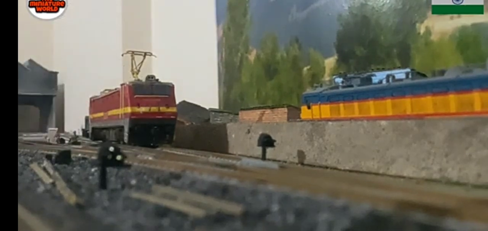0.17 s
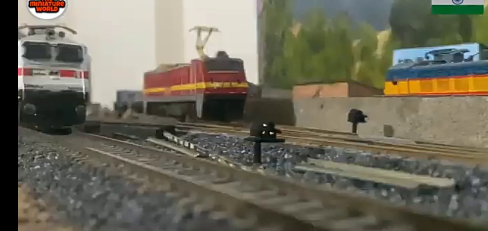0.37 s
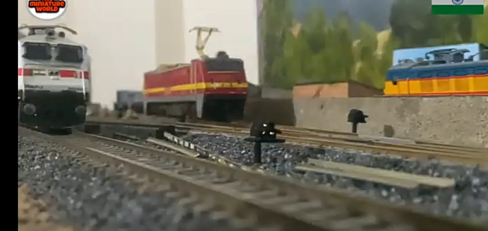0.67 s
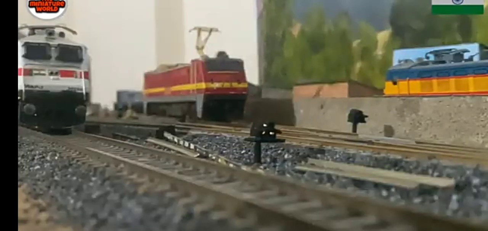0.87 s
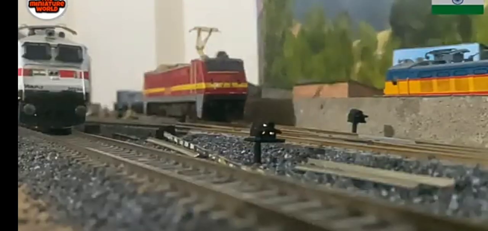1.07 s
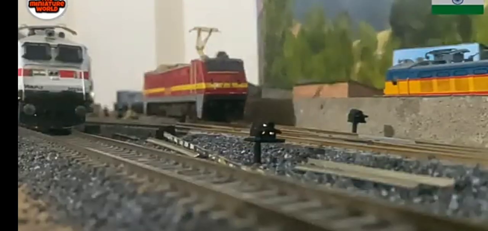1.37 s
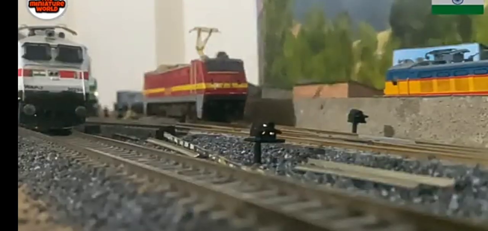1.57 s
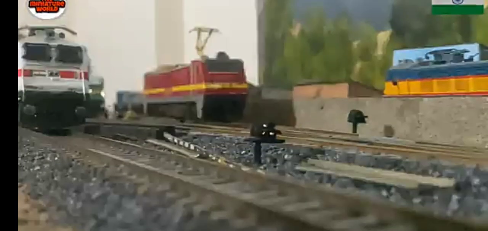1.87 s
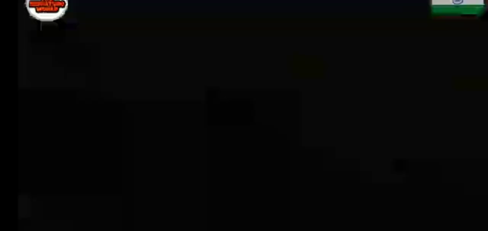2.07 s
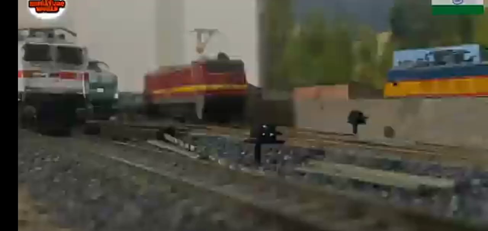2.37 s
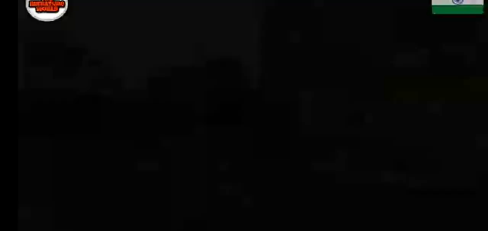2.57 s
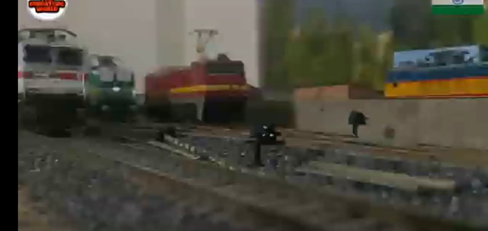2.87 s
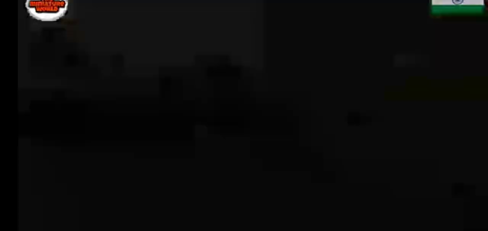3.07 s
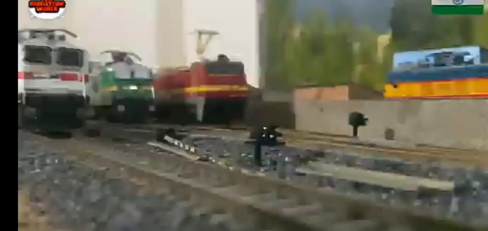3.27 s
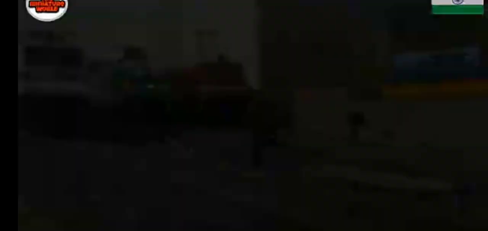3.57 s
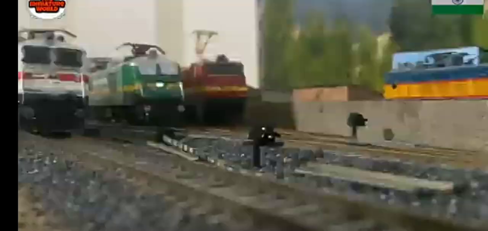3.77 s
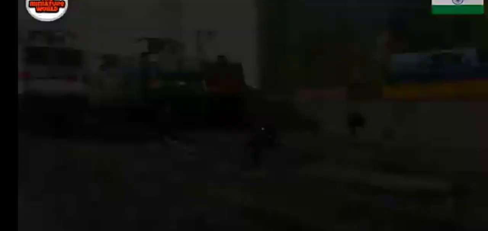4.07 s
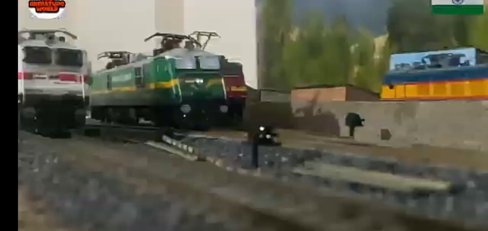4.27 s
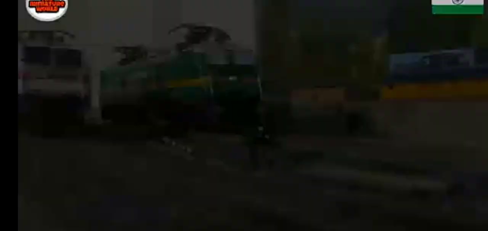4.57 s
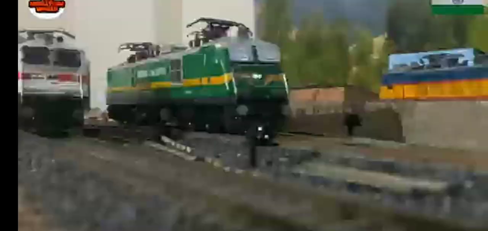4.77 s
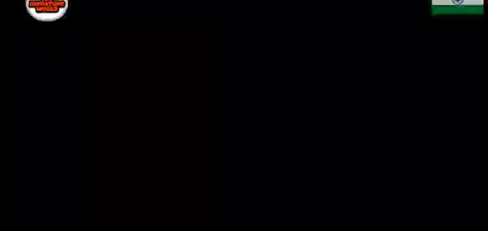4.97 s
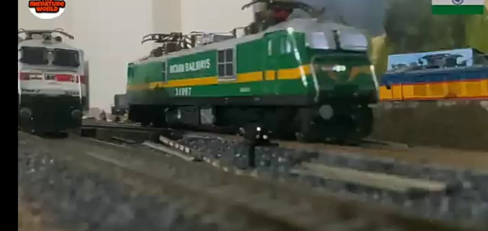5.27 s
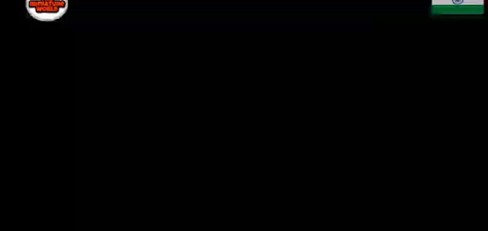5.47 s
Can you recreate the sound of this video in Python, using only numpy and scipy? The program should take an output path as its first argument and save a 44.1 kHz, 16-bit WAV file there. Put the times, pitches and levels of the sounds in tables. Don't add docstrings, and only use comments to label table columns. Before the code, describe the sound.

A toy-scale locomotive drones in a boxy midrange whir with a faint steady whine. It drops away, exposing far-off wheels grinding on rails and soft low pulses through a hollow baseboard. Then the motor snaps back much louder, with a fluttering gear buzz, and strengthens again while scraping wheel hiss draws nearer. Rail joints click, one sharply near the end. Indoors, close small microphone, grainy flickering highs and tiny ticks.

```python
import sys
import numpy as np
from scipy import signal
from scipy.fft import rfft, irfft, next_fast_len
from scipy.io import wavfile
from scipy.ndimage import uniform_filter1d, map_coordinates

SR = 44100
rng = np.random.default_rng(int(sys.argv[2]) if len(sys.argv) > 2 else 0)


def linear_from_db(decibels):
    return 10 ** (np.asarray(decibels, float) / 20)


def unload_wav(signal):
    wavfile.write(
        sys.argv[1],
        SR,
        np.round(np.clip(np.atleast_2d(signal).T, -1, 1) * 32767).astype(np.int16),
    )


N = 248274
T = np.arange(N) / SR
FRAME_S = 0.02
FULL_POWER_S = 3.578


def unit(x):
    return x / np.sqrt(np.mean(x ** 2) + 1e-20)


def curves(*tables):
    s, *cols = np.transpose(np.concatenate(tables))
    return [np.interp(T, s, c) for c in cols]


def wobble(rate):
    knots = rng.standard_normal(int(N * rate / SR) + 4)
    return map_coordinates(knots, [T * rate])


def coloured(x, points):
    m = next_fast_len(N + 8192)
    f, db = np.transpose(points)
    log_hz = np.log(np.fft.rfftfreq(m, 1 / SR) + 1)
    gain = linear_from_db(np.interp(log_hz, np.log(f + 1), db, left=-120, right=-120))
    return unit(irfft(rfft(x, m) * gain, m)[:N])


def patchy(depth_db, size=512):
    z = signal.stft(rng.standard_normal(N), nperseg=size)[2]
    field = uniform_filter1d(rng.standard_normal(z.shape), size=4, axis=0)
    field = uniform_filter1d(field, size=5, axis=1)
    return signal.istft(z * linear_from_db(depth_db * unit(field)), nperseg=size)[1][:N]


def inside(spans):
    mask = sum((T >= a) & (T < b) for a, b in spans)
    return uniform_filter1d(mask.astype(float), size=110, origin=54)


def near_locomotive():
    # start_s, whir_db
    drive = [
        [(0, -35.5), (.2, -36.5), (1.128, -34.5)],
        [(2.549, -28), (2.75, -29), (2.9, -27.5), (3.05, -30), (3.35, -30.5), (3.575, -28.5)],
        [(3.585, -26), (4.2, -25.5), (4.7, -24.5), (5.63, -25)],
    ]
    # pitch_hz, level_db (per Hz)
    shell = [(150, -47.5), (230, -22.5), (400, -20), (750, -16.5), (1020, -14), (1160, -5), (1250, 2.5),
             (1330, -0.5), (1600, -5.5), (2050, -2), (2980, -14), (3300, -29), (3650, -27), (4350, -39.5)]
    # order (multiple of shaft rate), level_db
    mesh_orders = [(13, -20), (14, -9.5), (15, -1), (16, -4.5), (17, -8), (18, -8), (19, -11), (24, -3.5)]
    off_s, on_s = 1.128, 2.549
    shaft_hz, whine_hz = 16.605, 884.7
    whine_db, whine_rise_s, whine_idle_db = -13.5, 0.13, -64.5
    mesh_db, mesh_bite_s, mesh_rise_s = -23, 2.9, 0.28

    whir_db, = curves(*drive)
    power = 1 - inside([(off_s, on_s)])
    turn = 2 * np.pi * shaft_hz * T + 0.04 * wobble(1.5)
    chatter = patchy(depth_db=-0.12) * linear_from_db(0.52 * np.cos(turn) + 0.75 * wobble(90))
    whir = linear_from_db(whir_db + 3.0) * coloured(chatter, shell)

    since_s = np.where(T < on_s, T, T - on_s)
    lock = np.clip(since_s / whine_rise_s, 0, 1) ** 2
    whine_gain = power * linear_from_db(whir_db + whine_db) * lock + linear_from_db(whine_idle_db)
    whine_tone = np.sin(2 * np.pi * whine_hz * T + 0.6 * wobble(12))
    whine = whine_gain * linear_from_db(1.5 + 2.2 * wobble(30)) * whine_tone

    mesh = np.zeros(N)
    for order, db in mesh_orders:
        phase = 1.52 - 1.2 * (order - 15) - 0.25 * (order - 15) ** 2
        mesh += linear_from_db(db + 1.7 * wobble(2.91)) * np.sin(order * turn + phase)
    load = np.clip((T - mesh_bite_s) / mesh_rise_s, 0, 1)
    return power * (whir + load * linear_from_db(whir_db + mesh_db) * mesh) + whine


def far_train():
    # start_s, rolling_db
    roll = [(0, -45), (.6, -43.5), (1.1, -36), (1.5, -33), (2.2, -33.5), (2.5, -34), (3, -30.5), (4, -30.5),
            (5.63, -29)]
    # pitch_hz, level_db (per Hz)
    rails = [(450, -42.5), (680, -22.5), (850, -9.5), (1100, -5.5), (1210, -2), (1255, 2.5), (1310, -7),
             (1700, -11), (2030, -5), (2300, -7), (2480, -13), (3300, -27.5), (3750, -30), (4250, -40)]
    # pitch_hz, level_db (per Hz)
    hollow = [(150, -23.5), (200, -7.5), (270, -8.5), (300, -2.5), (340, -7), (410, -5), (460, -2.5),
              (525, -1), (620, -4.5), (700, -11.5), (850, -27.5)]
    roll_db, = curves(roll)
    rolling = coloured(patchy(depth_db=1.1) * linear_from_db(0.7 * wobble(120)), rails)
    rumble = coloured(patchy(depth_db=4.5, size=2048), hollow)
    rumble_db = -47.5 + 0.65 * (roll_db + 34)
    return linear_from_db(roll_db) * rolling + linear_from_db(rumble_db) * rumble


def baseboard():
    # pitch_hz, level_db (per Hz)
    plank = [(15, -50), (25, -28.5), (46, -25), (64, -9), (75, -13), (104, -2), (120, -8.5), (140, -8.5),
             (165, -7.5), (190, -17.5), (260, -44)]
    # peak_s, peak_db, pitch_hz
    throb = [(0.326, -39, 108), (0.399, -39, 111), (0.714, -41.5, 107), (0.813, -36, 118),
             (0.896, -37, 110), (1.03, -46, 105), (1.226, -39, 109), (1.316, -37, 110), (1.397, -40, 103),
             (1.534, -41, 100), (1.612, -41, 107), (1.741, -43, 103), (1.814, -35.5, 108),
             (1.906, -41, 119), (1.957, -39, 103), (2.088, -33.5, 110), (2.202, -40, 112),
             (2.282, -35, 101), (2.372, -44, 105), (2.566, -40, 117), (2.698, -38.5, 99), (2.772, -44, 119),
             (2.887, -44, 115), (2.966, -40, 100), (3.042, -39, 119), (3.244, -46, 102), (3.362, -41, 102),
             (3.623, -43, 105), (3.992, -42, 110), (4.079, -40, 103)]
    step_s, gap_s, step_db, fade_db, step_hz = 4.34, 0.0908, -40, 0.4, 106

    out = linear_from_db(-52) * coloured(patchy(depth_db=1.0), plank)
    steady = [(step_s + gap_s * k, step_db - fade_db * k + 1.5 * a, step_hz + 5.0 * b)
              for k, (a, b) in enumerate(rng.standard_normal((14, 2)))]
    half = 2600
    t = np.arange(-half, half) / SR
    swell = np.exp(-(t / 0.018) ** 2)
    for s, db, hz in [*throb, *steady]:
        at = round(s * SR)
        phase = rng.uniform(0, 2 * np.pi)
        out[at - half:at + half] += linear_from_db(db - 1.5) * swell * np.sin(2 * np.pi * hz * t + phase)
    return out


def lost_frames():
    # start_s, end_s
    gaps = [(.65, .71), (.73, .85), (1.17, 1.25), (1.63, 1.69), (1.89, 1.93), (3.27, 3.31), (3.55, 3.59),
            (3.87, 3.91), (4.27, 4.31), (4.69, 4.73)]
    # start_s, frames_lost (count)
    flutters = [(.91, 2), (1.05, 3), (1.45, 4), (1.77, 3), (2.45, 2)]
    strays = [.55, .61, 1.29, 1.35, 1.99, 2.23, 2.39, 3.17, 3.23, 3.37, 3.51, 3.77, 4.49, 4.61, 4.85, 5.17,
              5.23]
    singles = [s + 2 * FRAME_S * k for s, count in flutters for k in range(count)]
    return [*gaps, *[(s, s + FRAME_S) for s in [*singles, *strays]]]


def wheel_hiss():
    # start_s, hiss_db
    approach = [(0, -72.5), (.55, -75.5), (.56, -61.5), (1.2, -62), (1.35, -57.5), (2.1, -55.5), (2.8, -57),
                (3.6, -51.5), (4.45, -52.5), (4.7, -50.5), (5.4, -48), (5.63, -44.5)]
    # pitch_hz, level_db (per Hz)
    wheels = [(3600, -38.5), (4300, -9), (4600, -4), (4900, -0.5), (5900, -1), (6300, -6.5), (6550, -22),
              (6700, -29.5), (7000, -63)]
    # pitch_hz, level_db (per Hz)
    upper_band = [(6550, -40.5), (6750, -7), (7100, 1), (7400, -0.5), (7900, -7.5), (8050, -14.5),
                  (8150, -44.5)]
    # pitch_hz, level_db (per Hz)
    top_band = [(7900, -61.5), (8050, -10), (8700, -10.5), (9500, -23), (9650, -57.5)]
    # pitch_hz, level_db (per Hz)
    spill_band = [(9450, -43), (9650, 5.5), (10300, -5), (11300, -15), (12500, -24), (14000, -19.5),
                  (15000, -14.5), (15700, -15)]
    # start_s, end_s
    fills = [(0, .57), (1.13, 1.31), (1.33, 1.37), (1.39, 1.45), (1.71, 1.79), (1.89, 1.91), (1.95, 2.05),
             (2.07, 2.09), (2.19, 2.23), (2.27, 2.53), (2.79, 2.81), (2.89, 2.93)]

    hiss_db, = curves(approach)
    flicker = np.repeat(rng.standard_normal((3, N // 882 + 2)), 882, axis=1)[:, 380:N + 380]
    low_db = hiss_db + 1.2 * flicker[0] - 10 * inside([(1.14, 1.18)])
    low = linear_from_db(low_db) * coloured(patchy(depth_db=1.3), wheels)

    kept = 1 - (1 - linear_from_db(-15.5)) * np.minimum(inside(lost_frames()), 1)
    masked = inside([(FULL_POWER_S, 5.1)])
    upper_db = hiss_db + 2 - 2.6 * masked + 0.57 * flicker[1]
    upper = linear_from_db(upper_db) * kept * coloured(patchy(depth_db=3.0), upper_band)

    close_db = np.maximum(hiss_db + 49, 0)
    spill_rise_db = 1.1 * (hiss_db + 52.5) + 2.2 * close_db
    spill_db = -81.5 + spill_rise_db
    spill = linear_from_db(spill_db + 1.5 * flicker[2]) * coloured(rng.standard_normal(N), spill_band)

    lift_db = 7 * (T > 2.85) - 8 * (T < 1.05) - 11 * (T < 0.55)
    ajar = (T > 4.6) * linear_from_db(-85 + 0.53 * spill_rise_db)
    leak = ajar + linear_from_db(-95 + 7.0 * wobble(12))
    top = (linear_from_db(-69 + lift_db) * inside(fills) + leak) * coloured(patchy(depth_db=1.0), top_band)
    return low + upper + top + spill


def amplifier_floor():
    # pitch_hz, level_db (per Hz)
    floor = [(7800, -24.5), (8100, -13.5), (9400, -15), (9700, -5.5), (12000, -9.5), (13800, -5.5),
             (14800, -2), (15700, -0.5)]
    return linear_from_db(-90.5) * coloured(rng.standard_normal(N), floor)


def rail_joints():
    # start_s, level_db, centre_hz, t60_s
    joints = [
        (.326, -61, 5500, 0.18),
        (2.882, -46.5, 5530, .15),
        (2.884, -39.5, 6920, 0.2),
        (5.173, -24, 5750, 0.024),
        (5.39, -43, 7360, 0.026),
    ]
    out = np.zeros(N)
    for s, db, hz, t60 in joints:
        age = np.maximum(T - s, 0)
        band = [(0.18 * hz, -25), (0.72 * hz, -6), (hz, 0), (1.2 * hz, -5), (1.3 * hz, -24), (2.7 * hz, -50)]
        envelope = linear_from_db(db - 60 * age / t60) * (1 - np.exp(-age / 0.002))
        out += envelope * coloured(rng.standard_normal(N), band)
    return out


def frame_ticks():
    # start_s, peak_db
    seams = [(3.6779, -66), (3.7383, -59), (3.7795, -66.5), (3.878, -62.5), (3.9194, -65), (3.9378, -59),
             (4.0182, -57.5), (4.0581, -60.5), (4.9181, -57), (5.0977, -61.5), (5.1381, -55)]
    joins = np.arange(FULL_POWER_S, N / SR - FRAME_S, FRAME_S)
    weak_db = -78.5 + 8.5 * rng.standard_normal(len(joins))
    steps = np.zeros(N)
    for s, db in [*zip(joins, weak_db), *seams]:
        steps[round(s * SR) + 40] = linear_from_db(db + 15)
    band = signal.butter(3, [9500, 14600], "band", fs=SR, output="sos")
    return signal.sosfilt(band, steps)


def scene():
    trains = near_locomotive() + far_train() + baseboard() + wheel_hiss() + rail_joints()
    return (trains + amplifier_floor() + frame_ticks())[None]


def low_pass(x):
    return signal.sosfilt(signal.butter(12, 15720, fs=SR, output="sos"), x)


def record(dry):
    return low_pass(dry)


dry = scene()
out = record(dry)
unload_wav(out)
```